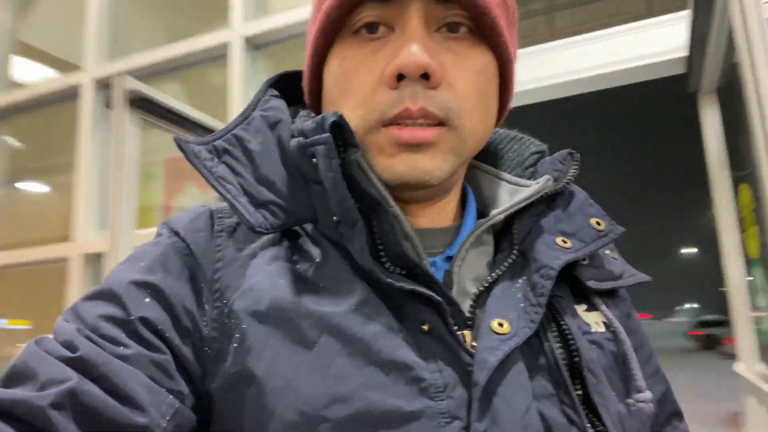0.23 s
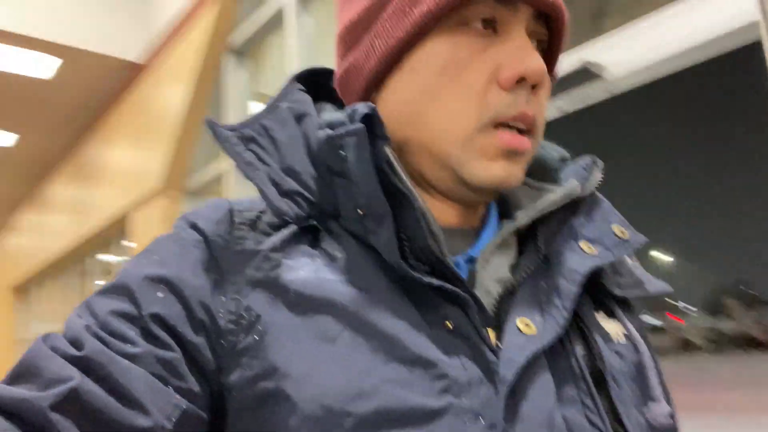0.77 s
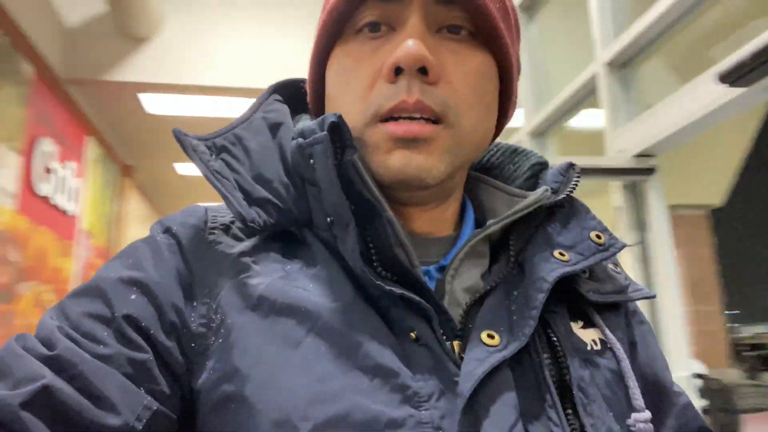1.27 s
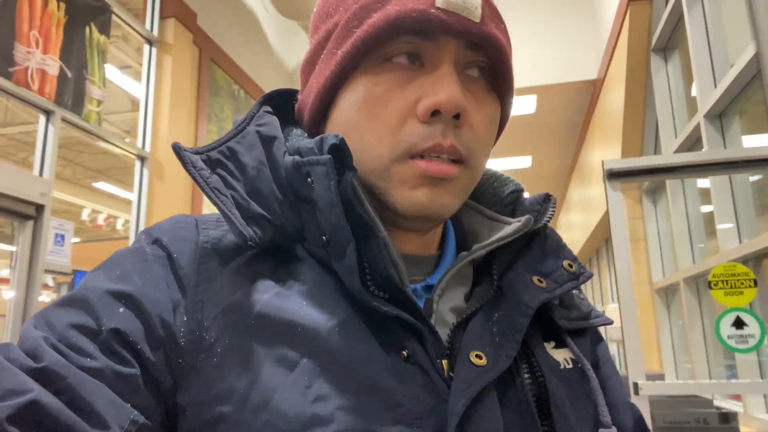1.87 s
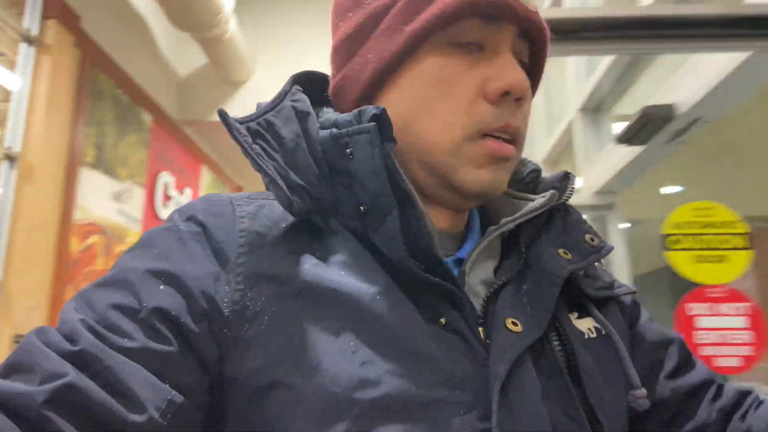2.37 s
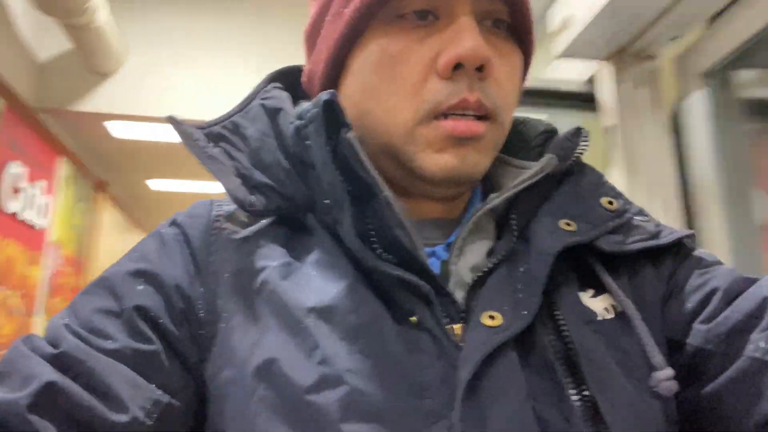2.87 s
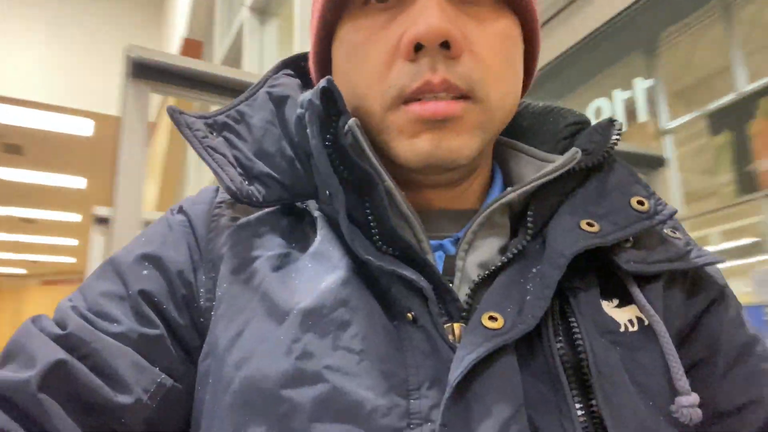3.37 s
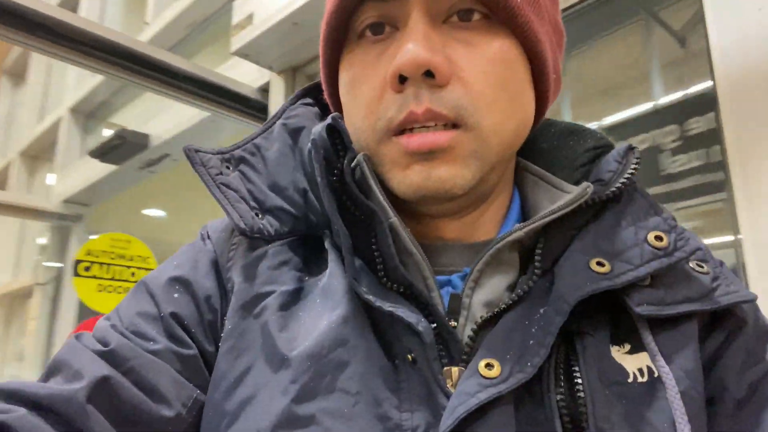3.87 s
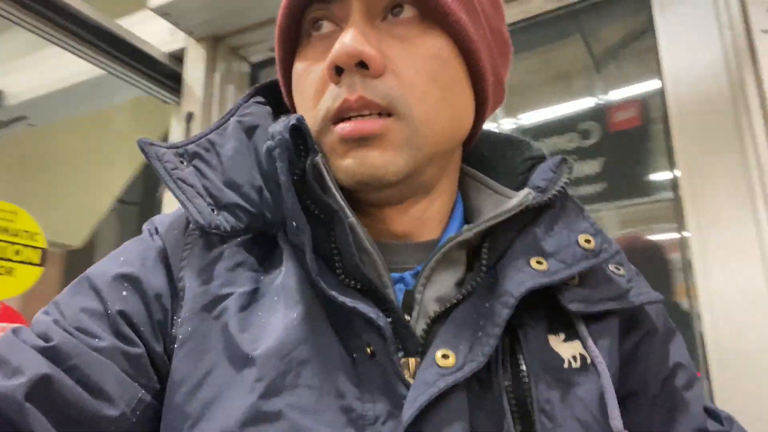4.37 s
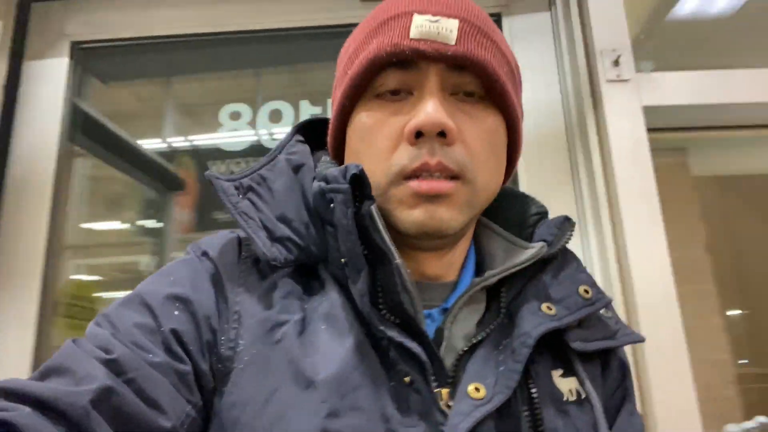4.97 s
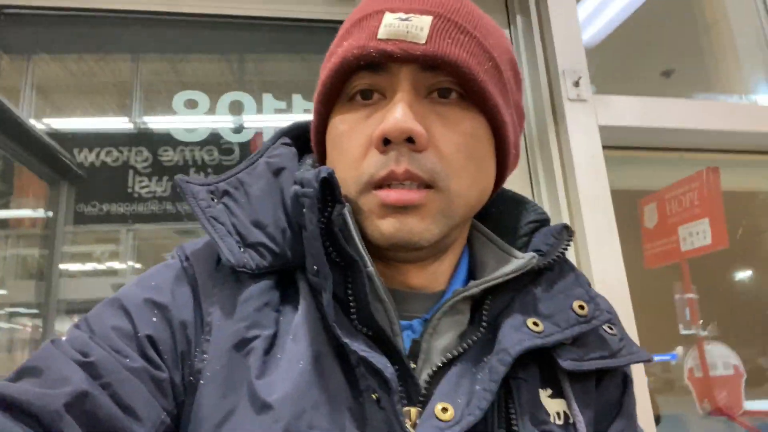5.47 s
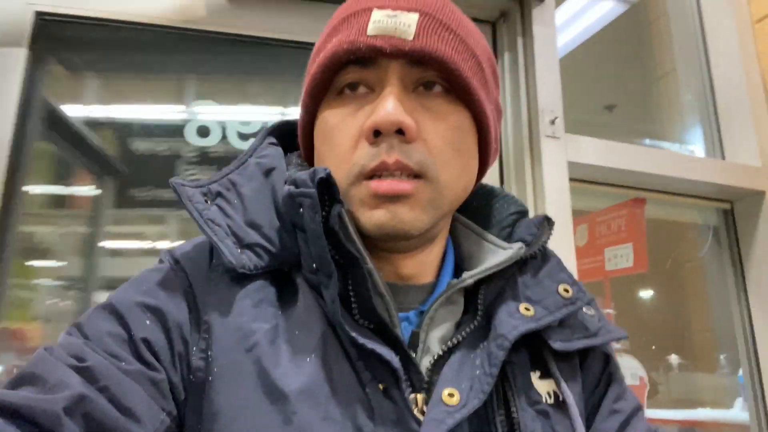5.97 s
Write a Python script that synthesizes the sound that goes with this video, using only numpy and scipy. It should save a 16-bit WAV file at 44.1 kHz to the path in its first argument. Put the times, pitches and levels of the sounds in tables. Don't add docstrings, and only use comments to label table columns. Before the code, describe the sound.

A wire shopping cart rolls through a tiled, glazed store entrance, heard in stereo from microphones riding on it. Throughout, hard wheels make a low, uneven rumble with a droning, buzzing frame, under a smooth air hiss and faint wavering door-motor hum. At about 1.1 s a loud metal clack, several strikes fused within a few hundredths of a second, echoes across the hall, leaving a soft tube ring. Rolling continues calmly, with a tiny tick around 1.5 s. From 3.0 to 3.7 s the wheels hit a sill: heavy dull thumps, hollow tube knocks and a basket rattle. At 4.15 s comes a sharp, bright crash of loose wires, followed by jingling and bumps through 5.0 s, strongest near 4.9. More hard knocks and rattles fall at 5.3 to 5.8 s; then rumble and a grainy caster whir carry on to about 6.2 s.

```python
import sys
import numpy as np
from scipy import signal
from scipy.fft import rfft, irfft
from scipy.io import wavfile
from scipy.ndimage import uniform_filter1d

SR = 44100
rng = np.random.default_rng(int(sys.argv[2]) if len(sys.argv) > 2 else 0)


def unload_wav(signal):
    wavfile.write(
        sys.argv[1],
        SR,
        np.round(np.clip(np.atleast_2d(signal).T, -1, 1) * 32767).astype(np.int16),
    )


def voltage_ratio(decibels):
    exponent = np.asarray(decibels, float) / 20
    return 10 ** exponent


N = 274302


def evened(x):
    return x / np.sqrt(np.mean(x ** 2) + 1e-20)


def read(points, hz):
    f, value = np.transpose(points)
    return np.interp(np.log(hz + 1), np.log(f + 1), value)


def curves(rows):
    s, *columns = np.transpose(rows)
    return [np.interp(np.arange(N) / SR, s, column) for column in columns]


def swells(rows):
    t = np.arange(N) / SR
    return sum(voltage_ratio(db) * np.sin(np.pi * np.clip((t - s) / length, 0, 1)) for s, length, db in rows)


def add(mix, s, sound):
    part = mix[:, round(s * SR):][:, :sound.shape[1]]
    part += sound[:, :part.shape[1]]


def tilted(x, db_per_octave, pivot_hz):
    hz = np.fft.rfftfreq(x.shape[-1], 1 / SR)
    return irfft(rfft(x) * voltage_ratio(db_per_octave * np.log2(hz / pivot_hz + .05)), x.shape[-1])


# f/Hz, in-step share
IN_STEP = [(60, 0.82), (150, 0.92), (380, 0.36), (950, -0.12), (1800, -0.34), (2500, 0.14), (3500, -0.011),
           (6000, -0.11), (7000, 0.028)]
# f/Hz, share
QUARTER_TURN = [(60, 0.29), (150, 0.355), (280, 0.48), (600, 0.64), (900, 0.37), (1250, -0.17),
                (1700, -0.48), (2600, 0.12), (4000, 0.12)]


def likeness(hz, side):
    same = read(IN_STEP, hz) + 1j * read(QUARTER_TURN, hz) * side
    return same / np.maximum(abs(same), 1)


# t/s, side of the main sound (1 right to -1 left)
HEADING = [(0, 0.66), (.5, 1), (1.25, 0.94), (1.5, -1.1), (2.2, -0.74), (2.95, -0.4), (3.15, 0.2),
           (3.5, 0.68), (3.75, -0.38), (4.05, 1), (6.22, 0.4)]
# f/Hz, level/dB
LEAN = [(60, -0.5), (150, 0), (380, -1), (950, 0.5), (2380, 4.5), (5980, 4.5), (15000, 4.5)]
LEAN_PER_SIDE_DB = -2
PORT_HZ, AGREE_HZ, PORT_LAG_S = 7600, 11900, .0002


def noise(spectrum, patchy_db, flicker_db, size, direct=0.57, lean_share=1):
    hop, hz = size // 4, np.fft.rfftfreq(size, 1 / SR)
    frames = N // hop + 5
    a, b, c, d, patches = rng.standard_normal((frames, len(hz), 5)).T
    patches = uniform_filter1d(patches, size=6, axis=0)
    patches = evened(uniform_filter1d(patches, size=8, axis=1))
    flicker = evened(uniform_filter1d(rng.standard_normal(frames), size=6))
    side = np.interp(np.arange(frames) * hop / SR, *np.transpose(HEADING))

    one_wave = direct * np.exp(-2j * np.pi * (hz - AGREE_HZ) * PORT_LAG_S)
    one_wave *= np.clip((hz - PORT_HZ) / 1500 + .5, 0, 1)
    hz = hz[:, None]
    same = likeness(hz, side) + one_wave[:, None]
    left, other = a + 1j * b, c + 1j * d
    z = np.array([left, same * left + np.sqrt(abs(1 - abs(same) ** 2)) * other])

    lean_db = read(LEAN, hz) + LEAN_PER_SIDE_DB * same.imag * (hz < 5000)
    lean_db = lean_db * lean_share / 2 * np.array([1, -1])[:, None, None]
    z *= voltage_ratio(read(spectrum, hz) + patchy_db * patches + flicker_db * flicker + lean_db)
    out = signal.istft(z, nperseg=size, noverlap=size - hop)[1][:, :N]
    return out / np.std(out.mean(0))


# t/s, wheel load level/dB, frame jolt level/dB
ROLLING = [(0.0, -1, -1), (0.76, -0.5, 4), (1.0, -0.5, 1.5), (1.33, -2, 2.5), (1.61, 2.5, 1.5),
           (2.12, 2, 0.5), (2.45, -2, 0.5), (2.77, 2.5, 1), (3.1, 0, -0.5), (3.32, 0, 12.5),
           (3.67, -1.5, -0.5), (3.9, 1, 3), (4.35, 5.5, 4.5), (4.68, -4, 8.5), (4.92, 6.5, 7.5),
           (5.2, -1.5, 2.5), (5.65, 1, 7), (6.22, 2, -0.5)]
# f/Hz, level/dB per Hz
RUMBLE = [(15, -44), (25, -65), (64, -4), (108, -9), (130, -6), (146, 5), (183, -4), (215, -2.5),
          (280, -28), (470, -120)]
# f/Hz, level/dB per Hz
DRONE = [(170, -10), (205, -13), (235, -0.5), (275, -3), (310, -7), (345, -16), (420, -45)]
# f/Hz, level/dB per Hz
BUZZ = [(200, -28), (335, -7.5), (424, -3), (569, 0), (640, -10.5), (693, -3), (769, -7.5), (967, -10),
        (1600, -21.5), (2080, -26), (3520, -120)]
RUMBLE_DB, DRONE_DB, BUZZ_DB = -28, -33, -33
BUZZ_DB_PER_JOLT_DB = 0.3


def wheels():
    load_db, jolt_db = curves(ROLLING)
    rumble = noise(RUMBLE, patchy_db=-0.15, flicker_db=-0.5, size=2048)
    deep = signal.sosfilt(signal.butter(2, 85, fs=SR, output="sos"), rumble)
    sway = uniform_filter1d(rng.standard_normal(N), size=3500)
    sway = evened(uniform_filter1d(sway, size=3500))
    rumble += deep * (voltage_ratio(3.2 * sway) - 1)
    drone = noise(DRONE, patchy_db=0.05, flicker_db=3.0, size=2048)
    buzz = noise(BUZZ, patchy_db=1.0, flicker_db=1.0, size=1024)
    out = voltage_ratio(RUMBLE_DB + load_db) * rumble
    out += voltage_ratio(DRONE_DB + jolt_db) * drone
    return out + voltage_ratio(BUZZ_DB + BUZZ_DB_PER_JOLT_DB * jolt_db) * buzz


# t/s, peak level/dB, f/Hz, t60/s
THUMPS = [(3.08, -21, 237, 0.49), (4.31, -22.5, 296, 0.11), (3.183, -6, 275, 0.088),
          (3.218, -2.5, 174, 0.16), (3.285, -0.5, 147, 0.069), (3.349, -12.5, 148, 0.25),
          (3.45, -9, 180, 0.15), (4.147, -8, 200, .06), (5.7, -13, 190, 0.067), (3.2165, -8.5, 540, .09),
          (3.2165, -12.5, 783, 0.066), (4.186, -11, 850, 0.045), (4.19, -8, 300, .08),
          (3.6105, -16, 687, 0.039), (5.6, -17, 800, .04), (3.36, -19, 72, 0.41), (5.623, -17, 620, .05),
          (5.632, -14, 281, .12), (3.284, -13.5, 600, .1), (5.503, -18, 900, .08), (3.448, -7, 138, 0.11),
          (3.563, -13, 136, 0.15), (3.61, -20, 219, 0.26), (3.728, -13.5, 173, 0.064),
          (4.05, -13, 170, 0.22), (4.277, -8.5, 260, 0.17), (3.165, -16, 255, .2), (3.303, -12, 143, 0.22),
          (4.767, -16, 198, 0.099), (5.414, -12, 189, .06), (4.358, -13, 295, 0.2),
          (4.368, -10.5, 280, 0.061), (4.105, -18, 260, 0.26), (4.471, -12, 274, 0.25),
          (4.756, -15.5, 257, 0.36), (4.86, -5.5, 282, 0.24), (4.963, -13, 272, 0.32),
          (4.471, -15, 410, 0.26), (4.935, -2, 152, 0.072), (5.264, -15, 160, 0.1), (5.494, -14, 280, 0.18),
          (5.529, -8.5, 174, 0.061), (5.629, -15, 150, 0.15), (5.685, -3, 153, 0.04)]
THUMP_LAG_S = 0.00054
LAG_TOP_HZ = 300


def thumps():
    t, out = np.arange(SR // 3) / SR, np.zeros((2, N))
    for s, db, hz, t60 in THUMPS:
        lag = np.array([[THUMP_LAG_S], [0]]) * min(1, LAG_TOP_HZ / hz) ** 2
        turn = 2 * np.pi * hz * (t - lag)
        mode = np.sin(turn) + 0.305 * np.sin(2 * turn) * voltage_ratio(-30 * t / t60)
        mode *= np.sin(np.pi / 2 * np.minimum(t / .004, 1))
        blow = mode * voltage_ratio(db - 0.5 - 60 * t / t60)
        add(out, s, blow * voltage_ratio([[-1.1], [1.1]]))
    return out


# t/s, peak level/dB, t60/s, tilt/dB per octave, starting snap level/dB
SHAKES = [(3.01, -34, .4, -1, -5), (3.255, -16, 0.49, -0.5, 7), (3.283, -31, 0.41, -6, -3),
          (3.372, -23, 0.54, 2.5, 11), (3.586, -50, 0.39, -14, -1), (3.9494, -28, 0.64, 2, -1),
          (4.08, -24.5, 0.93, -6, -4.5), (4.101, -15.5, 0.81, -0.5, -15), (4.148, -4.5, 0.2, -0.5, -6),
          (4.448, -16, 1.1, 0, -14), (4.678, -17, 0.57, -1.5, 8), (4.83, -17, 1.3, -1, -15),
          (4.954, -14.5, 0.26, -0.5, -7), (5.134, -55, 0.19, 12, -3), (5.275, -18, 0.3, 0.5, 1),
          (5.368, -19, 0.27, 2.5, -5), (5.455, -18.5, 1, 0, -6), (5.556, -20, 0.16, -2, -6),
          (5.644, -17, 0.6, -1, 12), (5.783, -20.5, 0.33, 2, -3), (5.841, -25, 0.12, -6.5, -1),
          (6.147, -29, 0.17, -1, 0)]
# f/Hz, level/dB per Hz
WIRE = [(1200, -4.5), (2000, -3.5), (2900, 0), (4500, 1), (6000, 2.5), (7200, 1), (8200, 4.5), (9000, 4),
        (11000, 0.5), (13300, -0.5), (14500, -3.5), (16000, 1.5)]
THICK_HZ, THICK_RISE_S, THICK_LONGER = 6800, 0.016, 1.35
HOLD_S, HOLD_PER_T60 = 0.0079, 0.063
TICKS_PER_S = 2500


def basket():
    ticks = voltage_ratio(np.minimum(rng.exponential(1, N), 4)) * (rng.random(N) < TICKS_PER_S / SR)
    ticks = signal.lfilter([1], [1, -.97], ticks)
    jingle = noise(WIRE, patchy_db=1.3, flicker_db=.4, size=512, direct=.75, lean_share=.55)
    jingle *= (2.38 + evened(ticks)) / 2.78
    lowpass = signal.butter(2, THICK_HZ, fs=SR, output="sos")
    t, out = np.arange(SR // 2) / SR, np.zeros((2, N))
    for s, db, t60, tilt, snap_db in SHAKES:
        hold = HOLD_S + HOLD_PER_T60 * t60
        shape = voltage_ratio(-60 * np.maximum(t - hold, 0) / t60)
        shape += voltage_ratio(snap_db) * np.exp(-t / 0.00073)
        shape += voltage_ratio(-16.5) * np.exp(-t / 0.0059)
        shape *= np.minimum(t / 0.0014, 1)
        piece = np.roll(jingle, -round(s * SR), 1)[:, :len(t)]
        piece = tilted(piece, tilt, pivot_hz=6800)
        thick = signal.sosfilt(lowpass, piece)
        slow = (1 - np.exp(-t / THICK_RISE_S)) * voltage_ratio(-60 * t / (t60 * THICK_LONGER))
        add(out, s, voltage_ratio(db - 12.5) * ((piece - thick) * shape + voltage_ratio(4.5) * thick * slow))
    return out


def panned(rows, pan_db, pivot_hz):
    return [(*row, pan_db * np.clip(np.log2(row[2] / pivot_hz), -2, 2)) for row in rows]


def clacks(rows, contact):
    t, out = np.arange(8192) / SR, np.zeros((2, N))
    hz = np.fft.rfftfreq(len(t), 1 / SR)
    same = .99 * likeness(hz, 1)
    upper = 1 / (1 + (3500 / (hz + 1)) ** 2)
    for s, db, centre_hz, spread, t60, pan_db in rows:
        colour = np.exp(-.5 * abs(np.log2((hz + 1) / centre_hz) / spread) ** 2.33)
        drive = rng.standard_normal((2, len(t)))
        drive[:, round(.6 * SR / centre_hz) + 30] += contact / np.sqrt(np.mean(colour ** 2))
        modes = rfft(drive) * colour
        modes[1] = same * modes[0] + np.sqrt(1 - abs(same) ** 2) * modes[1]
        low, high = irfft(modes * (1 - upper)), irfft(modes * upper)
        hit = low * voltage_ratio(-60 * t / t60) + high * voltage_ratio(-60 * t / (0.5 * t60))
        hit *= np.minimum(t / .0009, 1)
        hit /= abs(hit).max(1)[:, None]
        add(out, s, voltage_ratio(db - 1.0 + pan_db * np.array([[.5], [-.5]])) * hit)
    return out


NEAR_PAN_DB, NEAR_PIVOT_HZ = 2.5, 1800
# t/s, peak level/dB, centre f/Hz, t60/s
KNOCKS = [(2.988, -27, 590, 0.092), (3.345, -15, 590, 0.15), (3.674, -32, 600, 0.052),
          (4.133, -19, 596, .06), (4.174, -15, 505, 0.094), (4.997, -28, 553, 0.065),
          (5.704, -12.5, 551, 0.055), (5.736, -17.5, 654, 0.13), (5.958, -19, 610, .06),
          (6.108, -30, 600, .06), (3.183, -14.5, 625, 0.083), (3.216, -4.5, 590, 0.091),
          (3.24, -16, 310, 0.23), (3.283, -9.5, 505, 0.15), (3.612, -15.5, 400, 0.054),
          (3.635, -16.5, 554, 0.05), (4.186, -5, 577, 0.045), (4.278, -22, 694, .048),
          (4.42, -16, 346, 0.7), (4.47, -19, 397, 0.59), (4.713, -17, 497, 0.42), (4.76, -16, 493, 0.11),
          (4.86, -9, 570, 0.071), (4.88, -10.5, 287, 0.11), (4.928, -11, 743, 0.11), (4.945, -8, 396, 0.23),
          (4.735, -16, 1160, 0.2), (5.491, -11.5, 606, 0.3), (5.623, -12, 545, 0.075),
          (5.68, -14, 525, 0.066)]
# t/s, peak level/dB, centre f/Hz, spread/octaves, t60/s
TICKS = [(1.441, -39, 2590, 0.23, .25), (1.535, -24.5, 2470, 0.14, 0.06), (3.184, -20, 2530, 0.18, 0.055),
         (3.215, -15.5, 2400, 0.55, 0.17), (3.263, -26, 2420, 0.055, .3), (3.288, -24, 2470, .05, 0.18),
         (3.347, -25, 1990, 0.042, 0.099), (3.379, -25, 2440, 0.056, .12), (3.29, -25, 5360, 0.23, .6),
         (4.151, -15, 2900, .4, 0.16), (4.187, -9, 1990, 0.93, 0.11), (4.565, -16.5, 2410, 0.51, 0.21),
         (4.735, -16, 2720, 0.18, 0.12), (4.929, -19, 2300, 0.29, 0.044), (5.492, -16, 2600, 0.46, 0.091),
         (5.496, -9.5, 1860, 0.75, 0.16), (5.495, -22, 2050, 0.058, 0.28), (5.52, -22.5, 2270, 0.21, 0.79)]
KNOCK_SPREAD_OCT, KNOCK_SPREAD_HZ = 0.43, 540


def knocks_and_ticks():
    knocks = [(s, db, hz, KNOCK_SPREAD_OCT * hz / KNOCK_SPREAD_HZ, t60) for s, db, hz, t60 in KNOCKS]
    return clacks(panned(knocks + TICKS, NEAR_PAN_DB, NEAR_PIVOT_HZ), contact=0.86)


# t/s, peak level/dB, centre f/Hz, spread/octaves,
# t60/s
STRIKES = [(1.102, -19, 2500, .8, .1), (1.106, -17, 3000, .8, .08), (1.127, -18, 3400, .6, .09),
           (1.148, -25, 3180, 0.43, 0.27), (1.18, -24, 2900, 0.34, .3), (3.2175, -12, 770, 0.42, 0.097),
           (3.287, -10.5, 423, 0.57, 0.085), (3.349, -17, 330, .3, .1), (3.41, -13, 514, 0.28, 0.13),
           (3.532, -24, 482, 0.22, 0.087), (3.6105, -22, 766, 0.46, 0.042), (4.1485, -11, 9000, .6, .06),
           (4.112, -21, 10000, .5, .06), (4.566, -17, 1680, 0.58, 0.14), (4.568, -23, 3080, .1, .07),
           (4.74, -24, 2900, .04, .15), (4.858, -19, 900, 0.5, 0.048), (5.33, -26, 400, 0.42, 0.28),
           (5.37, -23, 400, 0.37, .3), (5.415, -24, 403, 0.4, 0.086), (5.504, -10, 350, 0.45, 0.18),
           (5.535, -23, 2200, .3, .35), (5.573, -21, 11000, 0.35, .08), (5.635, -16, 400, 0.5, .08),
           (5.69, -24, 2600, 0.13, 0.24), (5.498, -14.5, 1300, 0.43, 0.13), (1.1125, -7, 4000, 0.65, .05),
           (1.2, -22, 3000, .6, .2), (1.1115, -17, 12000, .4, .014), (5.2765, -18, 12000, .3, .03),
           (5.6455, -19, 12000, .3, .03)]


def added_strikes():
    return clacks(panned(STRIKES, NEAR_PAN_DB, NEAR_PIVOT_HZ), contact=1.0)


# t/s, level/dB, f/Hz, t60/s
RING = (1.163, -15.5, 557, .42)


def tube():
    s, db, hz, t60 = RING
    t, out = np.arange(SR // 2) / SR, np.zeros((2, N))
    ring = np.sin(2 * np.pi * (hz * t + np.array([[0], [.15]])))
    add(out, s, ring * np.minimum(t / .008, 1) * voltage_ratio(db - 60 * t / t60))
    return out


# t/s, length/s, level/dB
WHIRS = [
    (.3, 0.58, -48),
    (1.3, 0.25, -45),
    (3.2, 0.29, -40),
    (5.55, 0.34, -42),
    (5.9, 0.98, -39.5),
]
# f/Hz, level/dB per Hz
WHIR = [(1500, -38), (2150, 5), (2450, 4), (2800, 3.5), (3100, -34), (4200, -52)]


def caster():
    return swells(WHIRS) * noise(WHIR, patchy_db=2.2, flicker_db=1.0, size=512)


# f/Hz, level/dB
RODS = [(1432, -66), (2546, -49), (3273, -67)]
ROD_WIDTH_HZ = 4.7


def rods():
    drive = noise([(500, 0), (8000, 0)], patchy_db=1, flicker_db=1.5, size=1024)
    modes = np.zeros((2, N))
    for hz, db in RODS:
        modes += voltage_ratio(db) * signal.lfilter(*signal.iirpeak(hz, hz / ROD_WIDTH_HZ, SR), drive)
    jolt_db = curves(ROLLING)[1]
    return modes * np.sqrt(SR / np.pi / ROD_WIDTH_HZ) * voltage_ratio(0.23 * jolt_db - 22.0)


# t/s, peak level/dB, centre f/Hz, spread/octaves, t60/s
FAR_CLACKS = [(1.101, -14.5, 695, 0.71, 0.12), (1.132, -8, 2400, 0.73, 0.11), (1.111, -5, 3140, 1, 0.053),
              (1.112, -2.5, 470, 1.5, 0.11), (1.117, -1, 2200, 0.9, 0.053), (1.123, -11, 2200, 0.58, 0.13),
              (1.136, 3, 3000, 1.4, 0.055), (1.1378, -6.5, 11600, 0.14, 0.018),
              (1.146, -8, 1900, 0.72, 0.076), (1.155, -12, 2400, 0.54, 0.24),
              (1.211, -25, 1500, 0.74, 0.067), (1.232, -24, 1300, 0.98, 0.068), (1.258, -23, 1800, .8, .08),
              (1.141, 0, 1040, 0.7, 0.062), (1.139, -7.5, 407, 0.21, 0.068),
              (1.169, -11.5, 545, 0.25, 0.22), (1.193, -10, 860, 1.1, 0.053),
              (1.4, -27.5, 1093, 0.53, 0.77)]


def far_clack():
    return clacks(panned(FAR_CLACKS, pan_db=3.5, pivot_hz=1300), contact=1.77)


HUM_HZ = [681.3, 553.5, 817]
# t/s, length/s, level/dB
HUM_SWELLS = [
    [(-.3, 0.78, -44.5), (.35, 0.76, -38), (.9, 0.43, -48), (1.2, 0.55, -37), (3.5, 0.25, -47),
     (3.9, 0.4, -39), (4.5, 1.1, -44), (5.3, 0.93, -39.5)],
    [(-.3, 0.7, -42.5), (.5, 0.38, -41), (1.3, 1.25, -44), (5.7, 0.74, -42)],
    [(1.5, 0.59, -49.5), (3.7, 0.26, -48.5), (4.42, 0.82, -50), (6, 0.87, -43)],
]
HUM_IDLE_DB = -62.5


def door_drive():
    out = np.zeros((2, N))
    port_turn = curves(HEADING)[0] * np.array([[-.5], [.5]])
    for hz, rows in zip(HUM_HZ, HUM_SWELLS):
        waver, flutter = (evened(v) for v in uniform_filter1d(rng.standard_normal((2, N)), size=3000))
        turn = 2 * np.pi * np.cumsum(hz + 6 * waver) / SR
        level = (voltage_ratio(HUM_IDLE_DB) + swells(rows)) * voltage_ratio(6.0 + 1.8 * flutter)
        out += level * np.sin(turn + port_turn)
    return out


# f/Hz, level/dB per Hz
HISS = [(700, 3.5), (1200, -0.5), (1700, 4), (2500, 3), (3700, -1.5), (5000, -3.5), (6500, -3.5),
        (8500, -7.5), (10000, -13.5), (12000, -20.5), (16000, -24)]
HISS_DB, HISS_DB_PER_JOLT_DB = -39.5, 0.55


def air():
    jolt_db = curves(ROLLING)[1]
    hiss = noise(HISS, patchy_db=1.08, flicker_db=0.0, size=512)
    return voltage_ratio(HISS_DB + HISS_DB_PER_JOLT_DB * jolt_db) * hiss


# f/Hz, t60/s
HALL = [(200, 0.29), (1000, 0.76), (4000, 0.39), (7000, 0.51), (12000, 0.24)]


def hall(x):
    taps = np.zeros((2, SR))
    at = np.arange(300, SR - 20, 20) + rng.integers(0, 20, (2, (SR - 301) // 20))
    np.put_along_axis(taps, at, rng.choice([-1., 1.], at.shape), 1)
    hz, t, z = signal.stft(taps, SR, nperseg=256)
    tail = signal.istft(z * voltage_ratio(-60 * t / read(HALL, hz)[:, None]), SR, nperseg=256)[1]
    return signal.fftconvolve(x, tail / np.linalg.norm(tail[0]), axes=1)[:, :N]


def scene():
    steady = wheels() + basket() + caster() + rods() + door_drive() + air()
    near = thumps() + knocks_and_ticks() + added_strikes() + tube()
    far = far_clack()
    return steady + far + near + hall(voltage_ratio(-7.0) * far + voltage_ratio(-9) * near)


REFRESH_S, REFRESH_EVERY_S = .338, .6935


def since_refresh(t):
    return (t - REFRESH_S + REFRESH_EVERY_S / 2) % REFRESH_EVERY_S - REFRESH_EVERY_S / 2


# from f/Hz, to f/Hz
MID_GAPS_QUIET = [(9000, 10350), (13450, 22050)]
MID_GAPS_LOUD = [(9100, 9850), (13700, 22050)]
SIDE_GAPS_QUIET = [(10950, 13100), (15300, 22050)]
SIDE_GAPS_LOUD = [(11050, 12900), (15550, 22050)]
ATTACKS = [1.111, 1.128, 3.01, 3.256, 3.372, 4.079, 4.106, 4.148, 4.27, 4.449, 4.49, 4.682, 4.955, 5.276,
           5.369, 5.454, 5.573, 5.645, 5.783, 5.841, 6.147]
# from t/s, to t/s
SPENT_S = (5.29, 5.85)
# from t/s, to t/s, from f/Hz, to f/Hz
DROPOUT = (4.5, 4.53, 2050, 2280)


def jittered(gaps, hz, frames):
    mask = 0
    for low_hz, high_hz in gaps:
        above = hz > low_hz + 170 * rng.integers(-1, 2, frames)
        mask = mask + (above & (hz < high_hz + 250 * rng.integers(-1, 2, frames)))
    return mask


def starved(x, gaps_quiet, gaps_loud, refresh_hz, spent_s, dropout):
    lead = 1024 - 270
    window = np.sin(np.pi * (np.arange(2048) + .5) / 2048)
    hz, t, z = signal.stft(np.pad(x, (lead, 0)), SR, window, nperseg=2048, noverlap=1024)
    t = t - lead / SR
    treble_db = 10 * np.log10((abs(z[(hz > 9000) & (hz < 15000)]) ** 2).sum(0) + 1e-12)
    rise_db = np.diff(treble_db, prepend=0)
    loud = treble_db > np.percentile(treble_db, 30) + 9 + 2.5 * rng.standard_normal(len(t))
    loud &= (t < spent_s[0]) | (t > spent_s[1])
    since = t[:, None] - np.array(ATTACKS)
    struck, ringing = (((since > -.006) & (since < s)).any(1) for s in (.017, .036))
    hz = hz[:, None]
    quiet_gap = jittered(gaps_quiet, hz, len(t))
    gap = np.where(loud, jittered(gaps_loud, hz, len(t)), quiet_gap)
    gap = np.where(ringing & (hz > 15200), hz > 15750, gap)
    gap = np.where(struck & (hz < 14200), 0, gap)
    gap = np.where(struck & (rise_db > 7), hz > 15700, gap)
    gap = np.where(abs(since_refresh(t)) < .018, hz > refresh_hz, gap)
    from_s, to_s, from_hz, to_hz = dropout
    gap = gap | ((t > from_s) & (t < to_s) & (hz > from_hz) & (hz < to_hz))
    weak = (hz > 8300) & (abs(z) < .75 * uniform_filter1d(abs(z), size=32, axis=0))
    return signal.istft(z * (1 - gap) * ~weak, SR, window, nperseg=2048, noverlap=1024)[1][lead:][:N]


def roll_off(x):
    return signal.sosfilt(signal.butter(12, 16490, fs=SR, output="sos"), x)


def record(dry):
    x = signal.sosfilt(signal.butter(2, 38, "high", fs=SR, output="sos"), dry)
    power_db = 10 * np.log10(abs(uniform_filter1d((x ** 2).mean(0), size=600)) + 1e-12)
    fall_db = np.arange(N) * 36.0 / SR
    over_db = np.maximum(np.maximum.accumulate(power_db + fall_db) - fall_db + 18.0, 0)
    x = x / voltage_ratio(0.41 * signal.lfilter([.003], [1, -.997], over_db))
    x = .95 * np.tanh(x / .95)
    treble = signal.sosfilt(signal.butter(2, 9000, "high", fs=SR, output="sos"), rng.standard_normal(N))
    puff = voltage_ratio(-34.0) * evened(treble) * np.exp(-(since_refresh(np.arange(N) / SR) / 0.02) ** 2)
    mid = starved(x.mean(0) + puff, MID_GAPS_QUIET, MID_GAPS_LOUD, 15700, SPENT_S, DROPOUT)
    side = starved((x[0] - x[1]) / 2, SIDE_GAPS_QUIET, SIDE_GAPS_LOUD, 10500, (0, 0), (0, 0, 0, 0))
    return roll_off(np.array([mid + side, mid - side]))


dry = scene()
out = record(dry)
unload_wav(out)
```